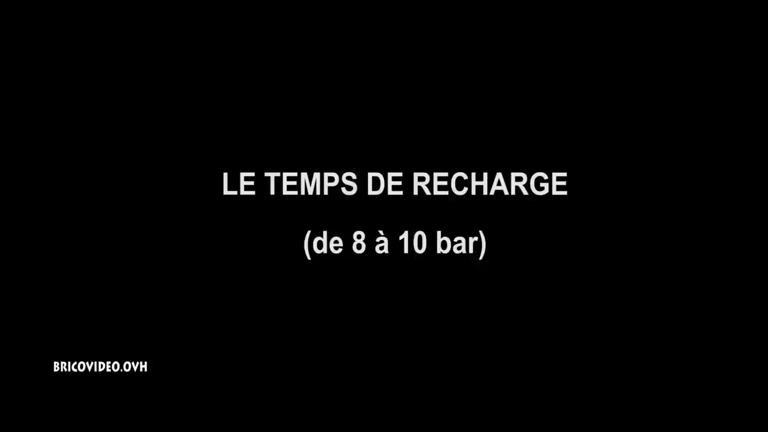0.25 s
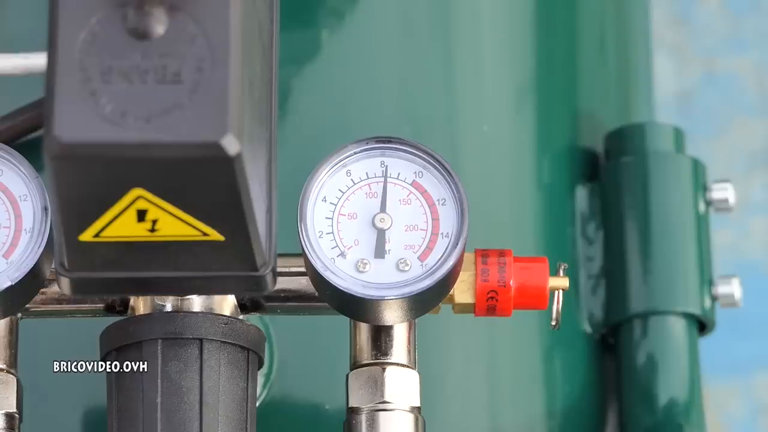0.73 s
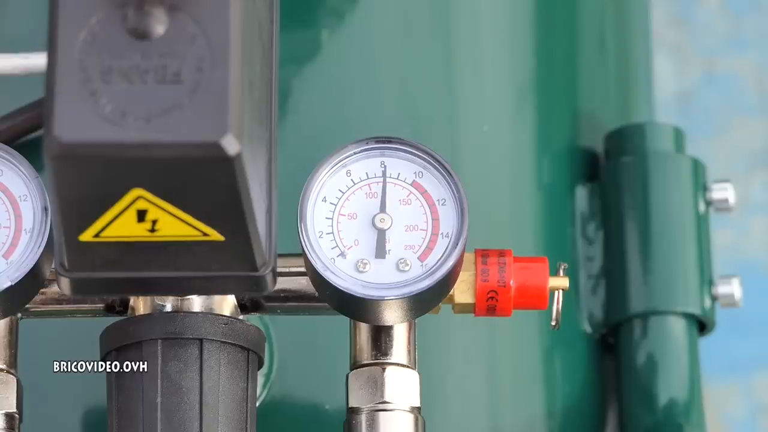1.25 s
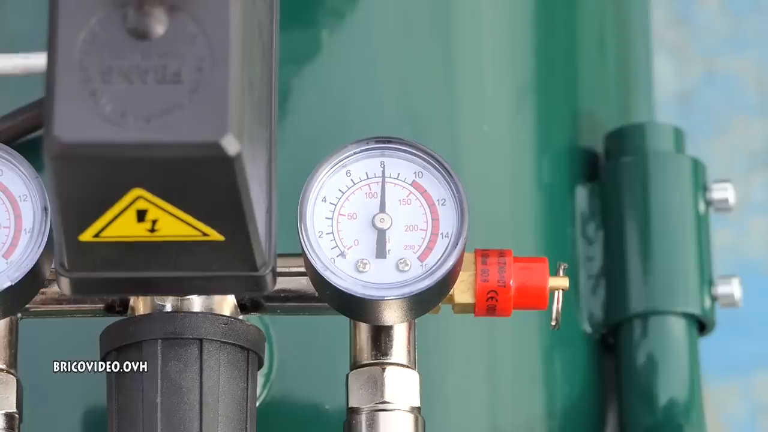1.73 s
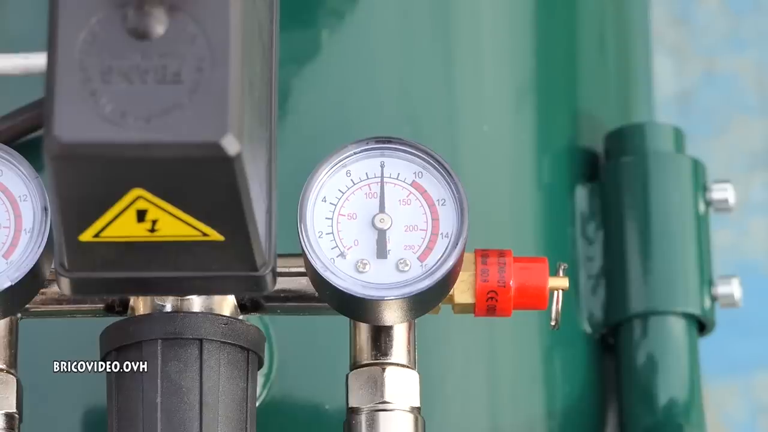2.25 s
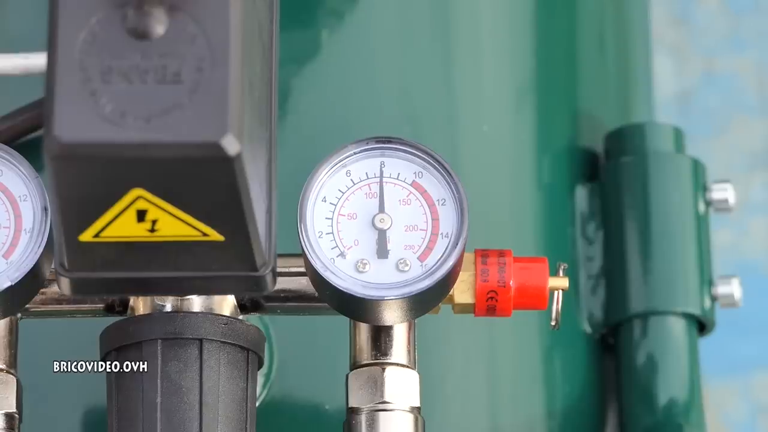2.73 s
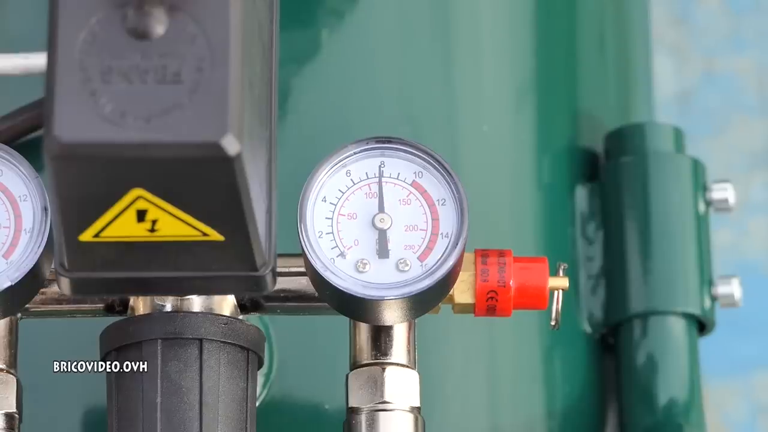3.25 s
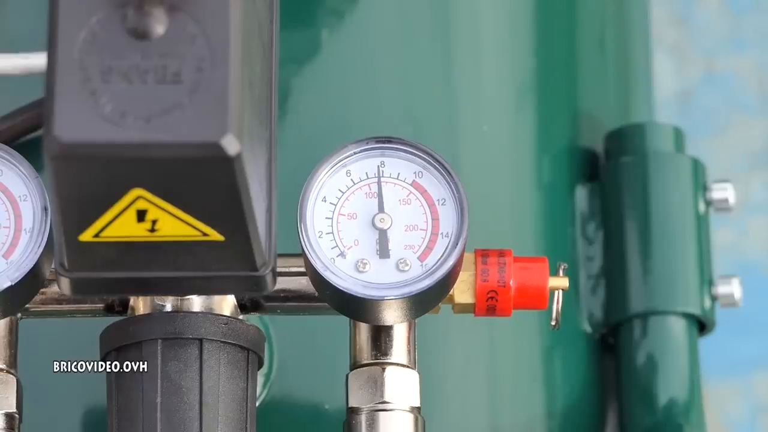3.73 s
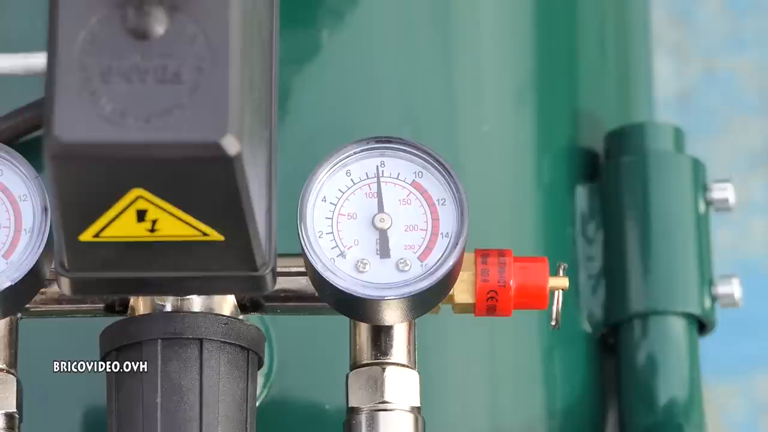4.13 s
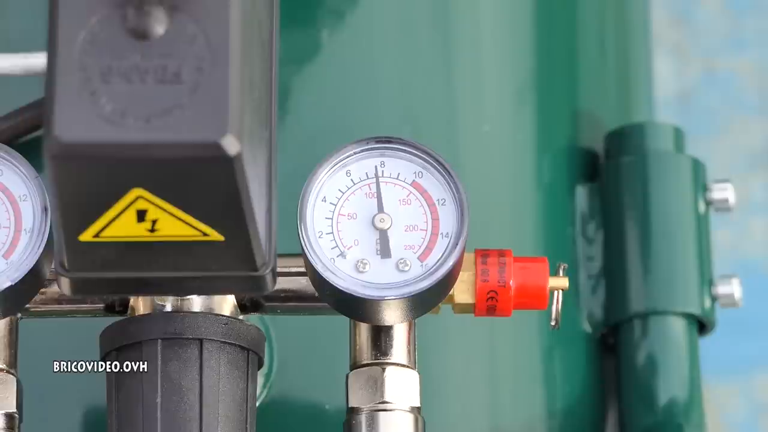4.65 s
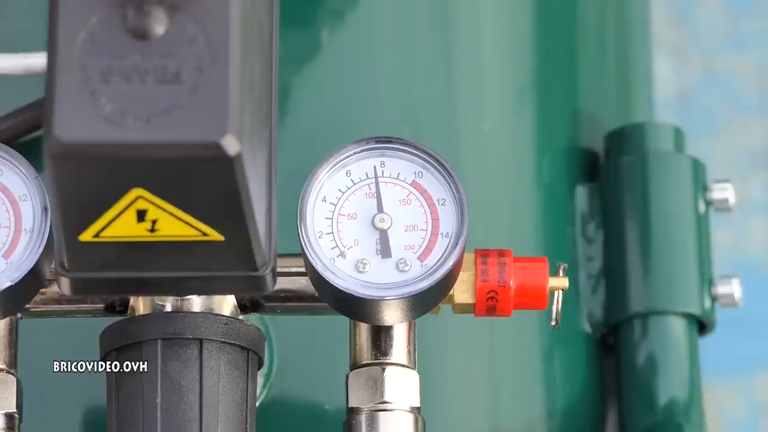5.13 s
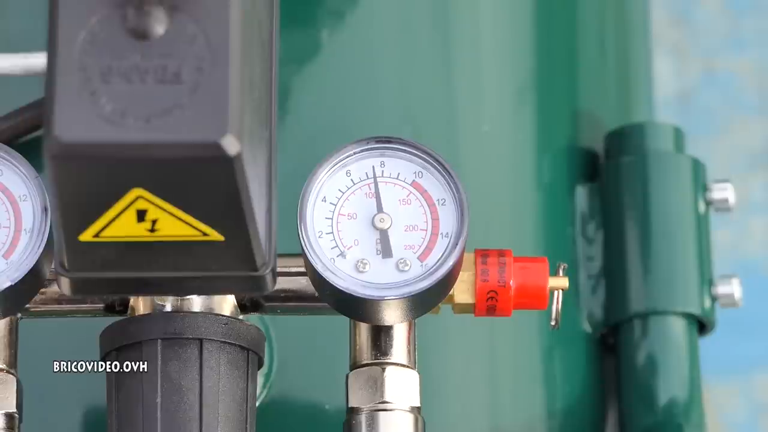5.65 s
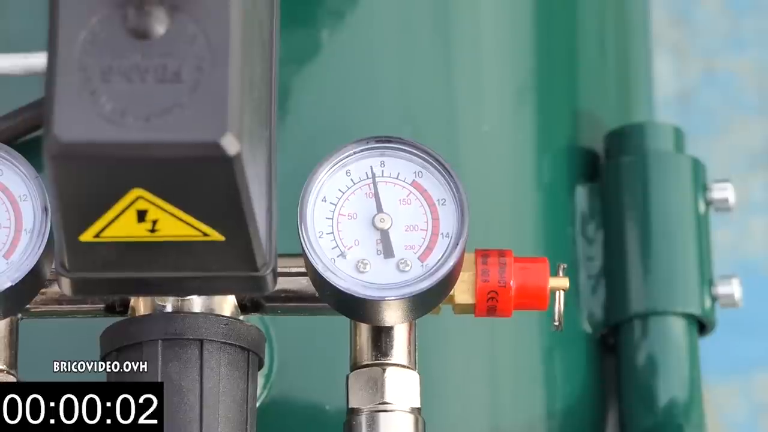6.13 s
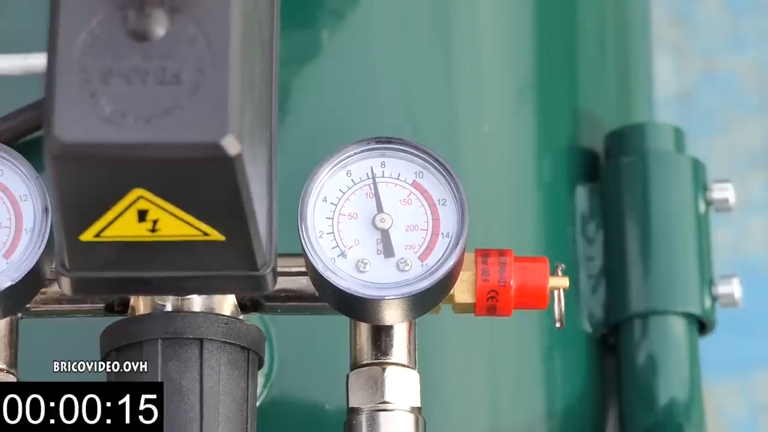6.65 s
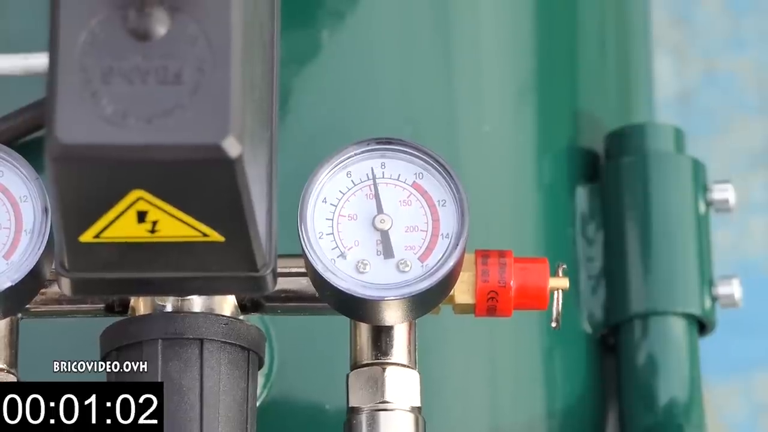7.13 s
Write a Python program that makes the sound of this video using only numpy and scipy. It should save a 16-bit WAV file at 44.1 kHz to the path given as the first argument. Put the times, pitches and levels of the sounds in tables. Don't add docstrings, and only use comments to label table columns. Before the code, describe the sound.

The first 0.7 seconds are silent. Then, abruptly and very close, compressed air drains from a steel tank through a fluttering valve: about 34 pops a second fuse into a coarse, rattling buzz. Each pop rings hollowly in pipe and tank and releases a bright hissing puff with thin high whistles. Irregular metallic clacks interrupt the beat, singly at first, with tight bursts around 2.0 to 2.3, 2.7, 3.6, and 5.2 to 6.0 seconds, each briefly choking the air. Faint low draught rumbles beneath, and nearby walls add a short tail. From about 5.9 seconds an electric piston pump fades in under the valve, which is gone by 6.3. The pump continues alone: a steady low motor hum turning about 47 times a second, quick knocks, pulsed intake hiss, fan noise and casing rumble, swelling gradually until it cuts to silence at 7.4 seconds.

```python
import sys
import numpy as np
from scipy import signal
from scipy.fft import rfft, irfft, next_fast_len
from scipy.io import wavfile
from scipy.ndimage import uniform_filter1d, map_coordinates

SR = 44100
rng = np.random.default_rng(int(sys.argv[2]) if len(sys.argv) > 2 else 0)


def volts_from_decibels(level):
    exponent = np.asarray(level, float) / 20
    return 10 ** exponent


def inscribe(sig):
    pcm = np.round(np.clip(np.atleast_2d(sig).T, -1, 1) * 32767)
    wavfile.write(sys.argv[1], SR, pcm.astype(np.int16))


N = 326163
TIME = np.arange(N) / SR
STROKE_S = 0.0293


def unit(x):
    return x / np.sqrt(np.mean(x ** 2) + 1e-20)


def along(points, hz):
    f, v = np.transpose(points)
    return np.interp(np.log(hz + 1), np.log(f + 1), v)


def colour(points):
    return lambda hz: volts_from_decibels(along(points, hz))


def wobble(rate):
    return map_coordinates(rng.standard_normal(int(N * rate / SR) + 4), [TIME * rate])


def filtered(x, response):
    m = next_fast_len(N + 8192)
    spectrum = rfft(x, m) * response(np.fft.rfftfreq(m, 1 / SR))
    return irfft(spectrum, m)[..., :N]


def rush(gain, alike, patchy_db):
    z = signal.stft(rng.standard_normal((2, N)), nperseg=128)[2]
    field = uniform_filter1d(rng.standard_normal(z.shape[1:]), size=3, axis=0)
    field = uniform_filter1d(field, size=4, axis=1)
    pair = signal.istft(z * volts_from_decibels(patchy_db * unit(field)), nperseg=128)[1][:, :N]

    def mid_side(hz):
        turn = np.arccos(np.clip(along(alike, hz), -1, 1)) / 2
        return gain(hz) * [np.cos(turn), np.sin(turn)]

    mid, side = filtered(pair, mid_side)
    return unit(np.array([mid + side, mid - side]))


def ring(t, hz, t60):
    return volts_from_decibels(-60 * t / t60) * np.sin(2 * np.pi * hz * t)


def strikes(times, db, shape):
    train = np.bincount((times * SR).astype(int), volts_from_decibels(db), N)
    return signal.fftconvolve(train, shape)[:N]


# frequency in Hz, level in dB per Hz.
DRAUGHT_COLOUR = [(15, -12), (30, -17), (70, 0), (130, 18), (250, -17), (500, -50)]


def draught():
    return volts_from_decibels(-52.0) * rush(colour(DRAUGHT_COLOUR), [(30, -0.16), (90, 0.07), (200, 0.18)], patchy_db=1.5)


# frequency in Hz, likeness from -1 to 1.
PUMP_LIKENESS = [(60, 0.75), (130, 0.87), (290, 0.7), (640, 0.71), (1410, 0.77), (3100, 0.58), (6820, 0.78),
                 (15000, 0.81)]

# frequency in Hz, level in dB per Hz.
FAN_COLOUR = [(1400, -30), (2400, -2), (3300, -2), (5000, -3), (7900, -6), (11000, -1), (12000, -17),
              (14000, -30), (16000, -40)]


def fan():
    return volts_from_decibels(-17.5 + 1.3 * wobble(30)) * rush(colour(FAN_COLOUR), PUMP_LIKENESS, patchy_db=5.0)


# frequency in Hz, level in dB per Hz.
CASING_COLOUR = [(25, -20), (60, -14), (200, 1.5), (500, -2.5), (700, -5.5), (880, 8.5), (1150, -6.5),
                 (1500, -2.5), (2200, -1), (2800, -11), (4000, -17), (11000, -16), (13000, -34)]


def casing(breath_db):
    return volts_from_decibels(-10.0 + 0.079 * breath_db) * rush(colour(CASING_COLOUR), PUMP_LIKENESS, patchy_db=1.5)


def breath(share):
    opens_at, opening, held, closing = 0.52, 0.11, 0.14, 0.34
    quiet_db, breath_db, sag_db = -21.5, 22, 5.5
    tick_db = 9.5 * np.exp(-((share - 0.32) / 0.07) ** 2)
    steps = opens_at + np.cumsum([0, opening, held, closing])
    return quiet_db + tick_db + np.interp(share, steps, [0, breath_db, breath_db - sag_db, 0])


# frequency in Hz, level in dB per Hz.
INTAKE_COLOUR = [(1410, -34), (2400, -22), (2580, -7), (3270, -6.5), (3930, -5), (4600, -2.5), (8280, -4.5),
                 (11100, 0.5), (14200, -8.5), (16000, -23)]


def intake(breath_db):
    return volts_from_decibels(-7.0 + breath_db) * rush(colour(INTAKE_COLOUR), PUMP_LIKENESS, patchy_db=1.0)


# frequency in Hz, level in dB, t60 in seconds.
HEAD_MODES = [(1434, -23, 0.029), (1780, -27, 0.036), (2230, -22.5, 0.031), (2610, -32, 0.024),
              (3510, -34, 0.073), (4040, -39, 0.091), (4850, -29.5, 0.048)]


def knock(turns):
    t = np.arange(SR // 20) / SR
    head = sum(volts_from_decibels(db + 14.5) * ring(t, hz, t60) for hz, db, t60 in HEAD_MODES)
    soft_start = 1 - np.exp(-t / 0.00068)
    top = TIME[1:][np.diff((turns - 0.64) % 1) < 0]
    return strikes(top, 1.4 * rng.standard_normal(len(top)), head * soft_start)


# multiple of the turning rate, level in dB.
SHAFT_ORDERS = [(1, -34), (2, -16.5), (3, -2.5), (4, -19), (5, -11.5), (6, -16), (8, 0.5), (9, -10),
                (10, -25), (12, -22.5), (13, -16), (15, -21.5), (16, -27), (17, -13), (18, -11.5),
                (19, -13.5), (20, -15.5), (21, -34), (23, -31), (25, -23.5), (29, -20), (30, -22),
                (32, -16), (35, -46), (40, -23), (46, -37), (47, -34), (54, -31), (56, -29), (85, -24.5)]


def hum(turns):
    total = 0
    for k, db in SHAFT_ORDERS:
        start = 2 * np.pi * (0.9198 * round(k) + 0.3757 * round(k) ** 2) - 2.8
        angle = 2 * np.pi * round(k) * turns + start + 0.04 * wobble(25)
        lag = 0.085 * rng.standard_normal() * np.array([[1], [-1]])
        total = total + volts_from_decibels(db + 2.5 + 0.46 * wobble(12)) * np.sin(angle + lag)
    return total


def pump():
    in_s, rise_s, start_db, grows_per_s = 5.924, 0.062, -37, 1.46
    on_s = np.clip(TIME - in_s, 0, None)
    level = volts_from_decibels(start_db) * (1 + grows_per_s * on_s) * (1 - np.exp(-on_s / rise_s))
    turns = 47.42 * (TIME - 6.45)
    crisp = 1 - 0.65 * np.cos(np.pi * (TIME - 6.842) / 0.44) ** 40
    breath_db = crisp * (breath(turns % 1) + 7) + 0.41 * wobble(40)
    return level * (hum(turns) + knock(turns) + intake(breath_db) + fan() + casing(breath_db))


# first slam in seconds, slams in a row,
# level of the first clack in dB, dB gained a slam.
SLAM_RUNS = [(0.7995, 1, -23, 0), (0.9367, 1, -28, 0), (1.0776, 1, -23, 0), (1.3629, 1, -18.5, 0),
             (1.741, 1, -23, 0), (1.8848, 1, -23, 0), (1.9965, 2, -25.5, 7.5), (2.2812, 2, -20, 1),
             (2.677, 1, -19.5, 0), (2.6994, 2, -24, -.5), (2.918, 1, -26, 0), (3.0297, 1, -20.5, 0),
             (3.6105, 4, -23.5, 2), (4.1145, 1, -21, 0), (5.1613, 1, -22, 0), (5.2462, 3, -18, -3),
             (5.6094, 1, -27, 0), (5.664, 3, -22, 0.2), (5.878, 2, -21.5, 0.5), (6.014, 2, -20, 0)]

BEAT_ANCHORS = [
    0.6866,
    1.6848,
    4.718,
    5.0102,
    6.201,
    6.2613,
]


def strokes():
    rebound_s, again_s = 0.0234, 0.0221
    slam_s, slam_db, rebound = [], [], []
    for s, run, first_db, gain_db in SLAM_RUNS:
        nth = np.arange(round(run))
        after = s + rebound_s + again_s * nth
        slam_s = np.r_[slam_s, s, after[:-1]]
        slam_db = np.r_[slam_db, first_db + gain_db * nth]
        rebound = np.r_[rebound, after[-1]]
    rebound = rebound[[np.abs(slam_s - s).min() > STROKE_S / 4 for s in rebound]]
    known = np.sort(np.r_[slam_s, rebound, BEAT_ANCHORS])
    beats = np.maximum(np.round(np.diff(known) / STROKE_S), 1)
    count = np.r_[0, np.cumsum(beats)]
    whole = np.arange(count[-1] + 1)
    drift = 0.0008 * rng.standard_normal(len(whole)) * ~np.isin(whole, count)
    times = np.interp(whole, count, known) + drift
    slammed = np.isin(times, slam_s)
    clack_db = -33 + 3 * rng.standard_normal(len(whole))
    clack_db[slammed] = slam_db
    return times, slammed, clack_db


def puff(since):
    lift_s, rise_s, hold_s, ease_s = 0.0028, 0.001, 0.0052, 0.004
    leak_db, puff_db, eased_db = -5, -0.6, -4
    steps = np.r_[np.cumsum([lift_s, rise_s, hold_s, ease_s]), STROKE_S]
    open_db = np.interp(since, steps, [leak_db, puff_db, puff_db, eased_db, leak_db])
    shut_db = open_db - 1.5 - 10.5 * np.clip((since - 0.014) / 0.0056, 0, 1)
    u = since / 0.0104
    whistle_db = 16 * ((u * np.exp(1 - u)) ** 8 - 1)
    return open_db, shut_db, whistle_db


# frequency in Hz, likeness from -1 to 1.
JET_LIKENESS = [(60, 0.27), (130, 0.67), (290, 0.56), (640, 1), (1410, 0.66), (3100, 0.49), (6820, 1),
                (15000, 0.26)]

# frequency in Hz, level in dB per Hz.
RUMBLE_COLOUR = [(15, -68), (25, -32), (156, -19), (232, -1.5), (444, -9.5), (626, -12.5), (730, -4.5),
                 (1380, -31), (1500, -22), (1950, -52), (3300, -120)]


def rumble(flow_db):
    return volts_from_decibels(-41.5 + 0.41 * flow_db) * rush(colour(RUMBLE_COLOUR), JET_LIKENESS, patchy_db=5.0)


# frequency in Hz, level in dB per Hz.
JET_COLOUR = [(600, -36), (1000, -12), (1650, -10.5), (2310, -6), (3000, -9.5), (3900, -11), (4250, -15),
              (4700, -4), (7350, -6), (9600, -3.5), (12400, -5), (13500, -14), (14200, -14), (15500, -7)]


def jet(flow_db):
    return volts_from_decibels(-24.5 + flow_db + 1.5 * wobble(150)) * rush(colour(JET_COLOUR), JET_LIKENESS, patchy_db=1.0)


# frequency in Hz, width in Hz, level in dB.
NOZZLE_WHISTLES = [
    (2340, 210, -45.5),
    (4820, 60, -48.5),
    (8620, 450, -40.5),
    (9600, 650, -37),
    (13184, 310, -32),
    (15550, 350, -43.5),
]


def whistles(whistle_db, shut, which):
    total = 0
    for hz, width, db in NOZZLE_WHISTLES:
        catch_db = 4 * np.tanh(rng.standard_normal(400) - 0.2)[which] + 2.2 * wobble(90)
        level_db = uniform_filter1d(whistle_db + catch_db - 12 * shut, size=60)
        peak = lambda f: 1 / (1 + ((f - hz) / width * 1.6) ** 2) ** 1.67
        total = total + volts_from_decibels(db + 6.5 + level_db) * rush(peak, JET_LIKENESS, patchy_db=1.5)
    return total


# frequency in Hz, level in dB, t60 in seconds,
# first push (+1) or pull (-1).
POP_MODES = [(148, -45, .12, 1), (215, -25.5, .045, 1), (283, -48, .118, 1), (311, -24, .034, -1),
             (435, -34, .07, -1), (510, -26.5, .016, -1), (627, -30, .028, 1), (660, -28.5, .035, -1),
             (769, -35, .044, 1), (918, -37.5, .029, 1), (981, -35.5, .023, 1), (1171, -29, .008, 1),
             (1350, -34, .006, 1), (1491, -42.5, .036, 1), (1772, -45.5, .046, 1), (2221, -44.5, .076, 1),
             (2445, -45, .047, 1)]


def pop(times, force):
    t = np.arange(SR // 10) / SR
    loud_db = 0.91 + 0.22 * rng.standard_normal(len(times))
    tilt_db = 0.75 * rng.standard_normal(len(times)) + 2.9 * force + 1.0 * np.roll(force, shift=1)
    total = 0
    for hz, db, t60, way in POP_MODES:
        bright_db = tilt_db * np.log2(hz / 300) + 0.54 * rng.standard_normal(len(times))
        total = total + strikes(times, db + loud_db + bright_db, np.sign(way) * ring(t, hz, t60))
    return total


# frequency in Hz, level in dB, t60 in seconds.
CLACK_MODES = [(2280, -14.5, 0.011), (2620, -23, 0.018), (4940, -6, 0.0038), (6010, 0, 0.0033),
               (6630, 13, 0.0021), (7610, -0.5, 0.0068), (8210, 3, 0.0036)]


def clack_and_thud(times, clack_db):
    t = np.arange(SR // 10) / SR
    seat = times + 0.0033 + 0.0002 * rng.standard_normal(len(times))
    give = 1 - np.exp(-(t / 0.0003) ** 2)
    clack = 0
    for hz, db, t60 in CLACK_MODES:
        hit_db = clack_db + db + 9.5 + 1.26 * rng.standard_normal(len(times))
        clack = clack + strikes(seat, hit_db, ring(t, hz, t60) * give)
    thud = strikes(seat, clack_db - 1.5, ring(t, 920, 0.01) * give)
    return clack, thud


def room(hits):
    t = np.arange(SR // 10) / SR
    walls = rng.standard_normal((2, len(t))) * volts_from_decibels(-60 * t / 0.17) * (t > 0.002)
    return signal.fftconvolve(hits[None], walls / np.linalg.norm(walls[0]), axes=1)[:, :N]


# frequency in Hz, left over right in dB.
VALVE_BALANCE = [(100, 0.5), (500, -1), (1300, -1.5), (2400, -3), (8000, -3), (15000, 2)]

# frequency in Hz, lead of the left in radians.
VALVE_LEAD = [(100, 0.13), (1380, -0.99), (2410, 0.61), (4820, 0.91), (9730, 0.3), (12000, 0.55),
              (15000, 0.78)]


def valve():
    times, slammed, clack_db = strokes()
    force = slammed * np.clip((clack_db + 23.5) / 11, 0, 1.2)
    clack, thud = clack_and_thud(times, clack_db)
    mouth = lambda f: (1j * f / (75 + 1j * f)) ** 2 / (1 + 1j * f / 2400) ** 2
    hits = filtered(pop(times, force) + thud, mouth) + clack

    which = np.clip(np.searchsorted(times, TIME) - 1, 0, None)
    open_db, shut_db, whistle_db = puff((TIME - times[which]) % 1)
    shut = np.clip(0.7 * slammed + 0.56 * force, 0, 1.1)[which]
    luck_db = 0.9 * rng.standard_normal(len(times))[which]
    flow_db = uniform_filter1d(open_db + shut * (shut_db - open_db) + luck_db, size=60)
    air = jet(flow_db) + whistles(whistle_db, shut, which) + rumble(flow_db)

    def image(f):
        return np.array([volts_from_decibels(along(VALVE_BALANCE, f) * h) * np.exp(1j * h * along(VALVE_LEAD, f))
                         for h in (0.5, -0.5)])

    sag_db = np.clip(TIME - 5.6, 0, None)
    pressure = volts_from_decibels(-sag_db) * np.clip((6.303 - TIME) / 0.024, 0, 1)
    return pressure * filtered(hits + volts_from_decibels(-25.0) * room(hits) + air, image)


def scene():
    return draught() + pump() + valve()


def roll_off(x):
    return signal.sosfilt(signal.butter(12, 16200, fs=SR, output="sos"), x)


def record(dry):
    on = (TIME > 0.6815) & (TIME < 7.396)
    heard = filtered(dry * on, lambda f: np.clip((15850 - f) / 150, 0, 1)) * on
    return roll_off(heard)


dry = scene()
out = record(dry)
inscribe(out)
```